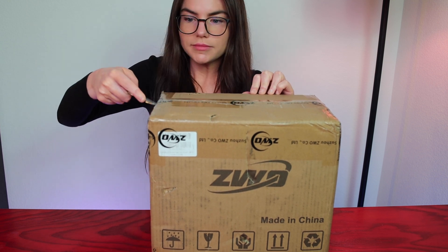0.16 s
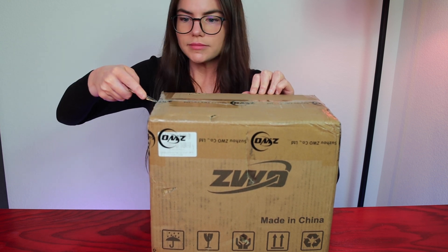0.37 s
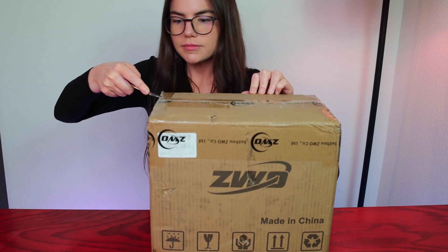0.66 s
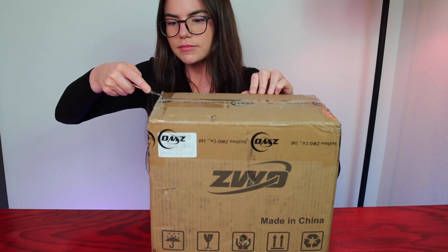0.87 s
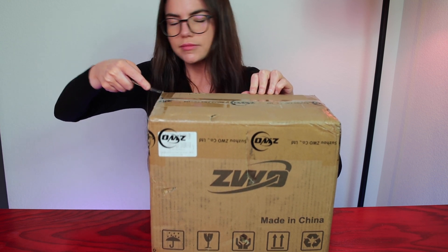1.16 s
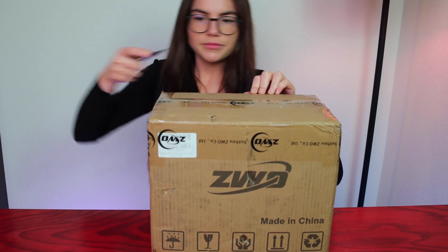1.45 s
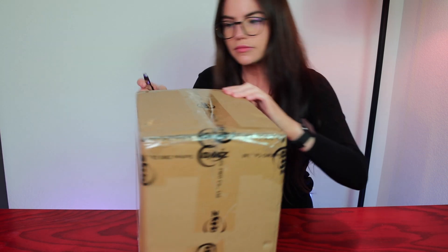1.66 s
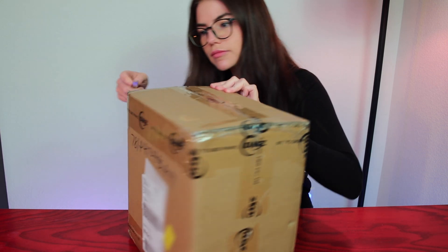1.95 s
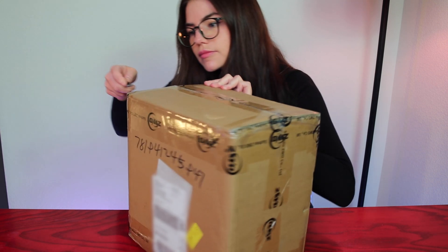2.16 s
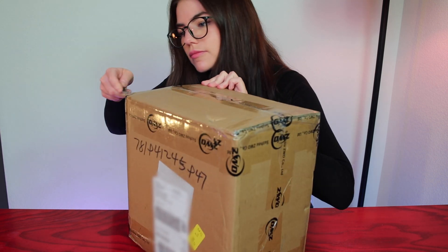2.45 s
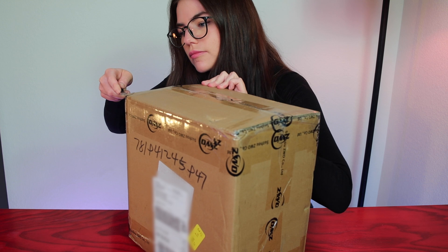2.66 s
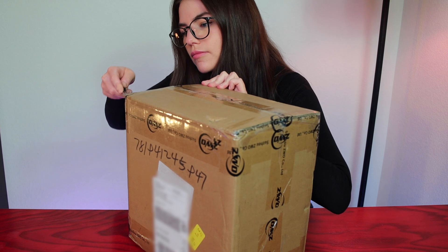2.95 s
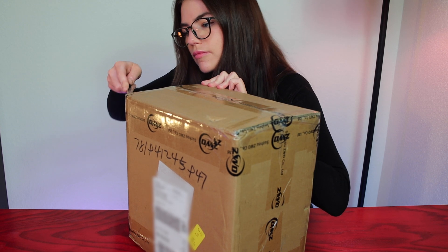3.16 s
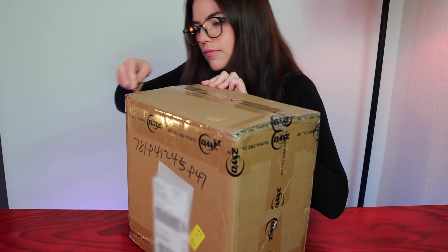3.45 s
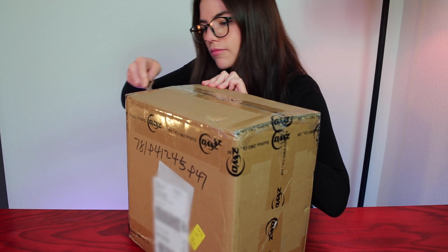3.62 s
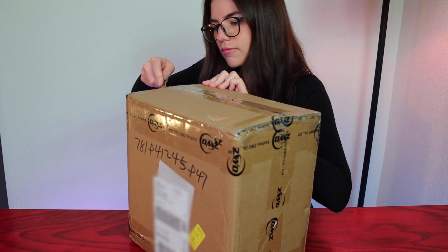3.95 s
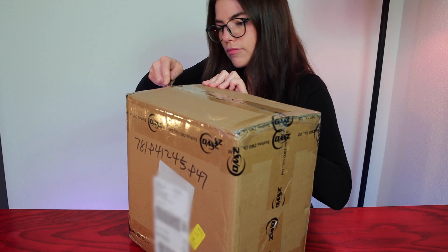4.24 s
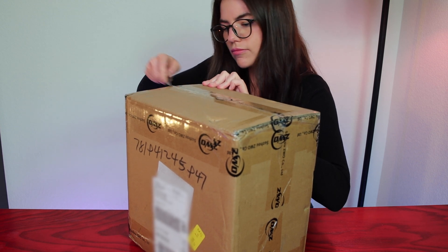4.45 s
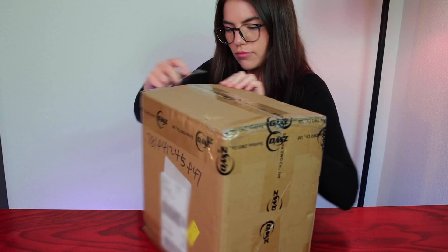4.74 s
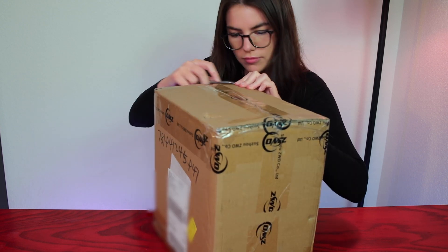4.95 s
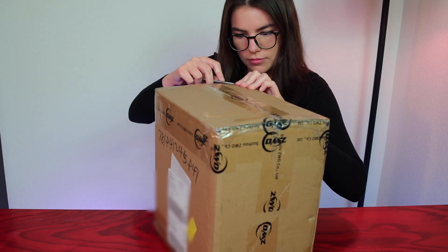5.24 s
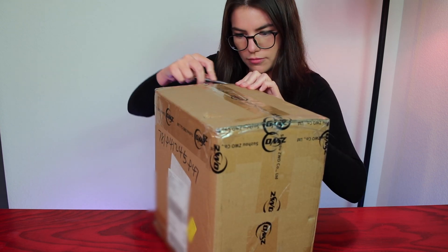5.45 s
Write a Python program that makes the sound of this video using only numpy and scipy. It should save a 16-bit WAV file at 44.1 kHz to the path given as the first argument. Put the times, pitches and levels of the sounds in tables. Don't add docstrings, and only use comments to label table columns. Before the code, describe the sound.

A quiet, softly furnished room with faint air noise and a low fan hum, heard by one near microphone, nearly mono. From 0 to 1.3 s a short blade saws through packing tape on a big hollow cardboard box: dry, gritty rasps in short strokes, with clean cracks and dull boxy booms. The loudest snap comes at 0.62 s; a narrow scraping along the flap swells around 1.0 and 1.25 s, and a bright snap parts the tape at 1.29 s. From 1.5 to 2.5 s the box turns, hissing and rumbling over the table with bumps and a sharp tap near 1.9 s. Faint ticks follow until 3.5 s, when ripping cuts resume to 4.2 s, with a strong crack at 3.87 s. A bright snap at 4.54 s precedes a short, bumping slide from 4.65 to 5.1 s. After near quiet, small cuts and snaps return from 5.3 s to the end.

```python
import sys
import numpy as np
from scipy import signal
from scipy.fft import rfft, irfft
from scipy.io import wavfile
from scipy.ndimage import uniform_filter1d

SR = 44100
rng = np.random.default_rng(int(sys.argv[2]) if len(sys.argv) > 2 else 0)


def natural_amplitude(level_db):
    exponent = np.asarray(level_db, float) / 20
    return 10 ** exponent


def wrap_up_sound(samples):
    columns = np.atleast_2d(samples).T
    tamed = np.clip(columns, -1, 1)
    steps = np.round(tamed * 32767).astype(np.int16)
    wavfile.write(sys.argv[1], SR, steps)


N = 246078


def rms_one(x):
    return x / np.sqrt(np.mean(x ** 2) + 1e-20)


def band(x, low_hz, high_hz):
    return signal.sosfilt(signal.butter(2, [low_hz, high_hz], "band", fs=SR, output="sos"), x)


def colour(x, spectrum):
    hz, db = np.transpose(spectrum)
    grid = np.maximum(np.arange(2049) * SR / 4096, 1)
    log_gain = np.log(natural_amplitude(np.interp(np.log(grid), np.log(hz), db)))
    cepstrum = irfft(log_gain)
    cepstrum[1:2048] *= 2
    cepstrum[2049:] = 0
    pulse = irfft(np.exp(rfft(cepstrum)))
    pulse /= np.sqrt(np.sum(pulse ** 2))
    return signal.fftconvolve(x, pulse)[:len(x)]


def body(x, modes, widen):
    out, power = 0, 0
    for k, (hz, width, db) in enumerate(modes):
        r = np.exp(-np.pi * width * widen / SR)
        a = [1, -2 * r * np.cos(2 * np.pi * hz / SR), r * r]
        b = np.array([1, 0, -1]) * (1 - r * r) / 2
        out = out + (-1) ** k * natural_amplitude(db) * signal.lfilter(b, a, x + 1e-18)
        power += natural_amplitude(db) ** 2 * (1 - r * r) / 2
    return out / np.sqrt(power)


def drift(rate):
    r = np.exp(-2 * np.pi * rate / SR)
    noise = rng.standard_normal(N + SR)
    return rms_one(signal.lfilter([1], [1, -2 * r, r * r], noise)[SR:])


def slips(per_s, spread_db, lurch_db):
    sizes = natural_amplitude(spread_db * np.minimum(rng.exponential(1, N), 3)) * rng.choice([-1, 1], N)
    happens = rng.random(N) < per_s / SR
    lurches = natural_amplitude(lurch_db * (0.74 * drift(78) + 0.65 * drift(25)))
    return rms_one(sizes * happens * lurches)


TURNED_S = 1.5


def each_end(x, sound):
    later = np.arange(len(x)) > TURNED_S * SR
    return sound(x * ~later, 0) + sound(x * later, 1)


# f/Hz, level/dB (per Hz)
AIR_COLOUR = [(18, -60), (30, -16.5), (115, -11), (245, -5.5), (394, -11), (721, -20.5), (801, -14.5),
              (937, -25.5), (1040, -22), (1670, -29.5), (1910, -27.5), (2120, -31), (4780, -32.5),
              (13700, -35), (16000, -36)]
AIR_DB = -52.5
HUM_HZ, HUM_WIDTH_HZ, HUM_DB = 239.7, 6.4, -56


def quiet():
    hum = body(rng.standard_normal(N), [(HUM_HZ, HUM_WIDTH_HZ, 0)], 0.53)
    hum = body(hum, [(HUM_HZ, 30, 0)], 0.44)
    air = colour(rng.standard_normal(N) * natural_amplitude(0.27 * drift(1.1)), AIR_COLOUR)
    return natural_amplitude(AIR_DB) * air + natural_amplitude(HUM_DB) * rms_one(hum)


ROOM_T60_S, ROOM_DB, WALL_CUT_HZ = 0.27, -20.5, 7900


def room(x):
    t = np.arange(SR // 2) / SR
    echoes = rng.standard_normal(len(t)) * natural_amplitude(-60 * t / ROOM_T60_S) * (t > .004)
    soften = signal.butter(1, [1200, WALL_CUT_HZ], "band", fs=SR, output="sos")
    echoes = signal.sosfilt(soften, echoes)
    return signal.fftconvolve(x, echoes / np.sqrt(np.sum(echoes ** 2)))[:N]


# t/s, level/dB
SLIDES = [
    [(1.5, -75), (1.58, -55), (1.67, -45.5), (1.76, -44.5), (2.02, -46), (2.12, -43), (2.28, -48),
     (2.47, -74)],
    [(4.64, -77), (4.68, -62), (4.72, -49), (4.94, -48), (5.03, -54.5), (5.09, -63), (5.13, -72)],
]
# t/s, level/dB
CATCHES = [
    (1.578, -54),
    (1.668, -50),
    (1.916, -64),
    (2.102, -46),
    (4.64, -50.5),
    (4.668, -48),
    (4.72, -50),
    (4.947, -59),
    (5.13, -61),
]
CATCH_DB_PER_S, CATCH_RUMBLE_DB = 300, -4
RUMBLE_DB, RUMBLE_FOLLOWS = -46.5, 0.73
SHUDDER_DB, SETTLE_S = -13, 0.28


def turning():
    t, rub = np.arange(N) / SR, -150.
    for rows in SLIDES:
        s, db = np.transpose(rows)
        outside = 4000 * np.clip(s[0] - t, 0, 1) + 60 / SETTLE_S * np.clip(t - s[-1], 0, 9)
        rub = np.maximum(rub, np.interp(t, s, db) - outside)
    catch = np.max([db - CATCH_DB_PER_S * np.abs(t - s) for s, db in CATCHES], axis=0)
    rumble = RUMBLE_DB + RUMBLE_FOLLOWS * (rub + 46)
    table = np.maximum(rumble + SHUDDER_DB, catch)
    rumble = np.maximum(rumble, catch + CATCH_RUMBLE_DB)
    return natural_amplitude(np.array([table, rumble, rub]))


# f/Hz, width/Hz, level/dB
THUD = [(62.3, 8.9, -2.5), (103, 43.6, 0), (150.2, 48.4, 0)]
# f/Hz, level/dB (per Hz)
RUMBLE_COLOUR = [(120, -31.5), (200, -2), (351, 0), (523, -11.5), (565, -7.5), (1110, -7), (1200, -8),
                 (2800, -12), (3640, -32), (6160, -120)]
# f/Hz, level/dB (per Hz)
HISS_COLOUR = [(1650, -21), (2800, -6.5), (3170, -3), (4060, -1.5), (6920, -2), (11800, -7), (14300, -2.5),
               (15200, -10), (16000, -1.5)]


def slide():
    thud, rumble, hiss = turning()
    rub = slips(6000, 4.0, 0.42)
    table = body(thud * rub, THUD, 0.52)
    grainy = colour(rumble * rub, RUMBLE_COLOUR)
    smooth = colour(hiss * slips(20000, 1.2, 0.93), HISS_COLOUR)
    return table + grainy + smooth


# t/s, level/dB
DRAG = [
    (.62, -60),
    (.78, -44),
    (.82, -62),
    (.87, -47),
    (1.03, -39.5),
    (1.11, -58),
    (1.17, -56),
    (1.24, -40),
    (1.3, -72),
]
# f/Hz, width/Hz, level/dB
FLAP_EDGE = [(2130, 310, -3), (2745, 170, 0.5)]


def flap():
    s, db = np.transpose(DRAG)
    pressure = natural_amplitude(np.interp(np.arange(N) / SR, s, db, left=-150, right=-150))
    return body(pressure * slips(5000, 2.7, 4.6), FLAP_EDGE, 1)


# t/s, crack level/dB, rap on the cardboard level/dB, push on the walls level/dB
BREAKS = [(.0593, -20.5, -55, -60), (.2907, -18, -21, -13.5), (.299, -27, -37, -56), (.0675, -36, -40, -50),
          (.607, -16, -16.5, -49), (1.0377, -19, -17.5, -16), (1.052, -22, -22, -47),
          (1.261, -27, -22.5, -26), (1.2986, -28, -38, -35), (1.5565, -40, -41.5, -33.5),
          (3.5426, -25, -23.5, -15), (3.6873, -28, -23.5, -24), (3.742, -25, -28, -24),
          (4.1457, -19, -21.5, -24), (4.1634, -24, -38, -19.5), (4.519, -33, -51, -50),
          (4.537, -35, -47, -46), (5.3182, -33, -34, -38), (5.431, -39.5, -37, -47),
          (5.5005, -38, -28, -30), (5.506, -18, -25, -34), (5.5340, -31, -27, -50)]
TEARS = [(.0232, -27, -32, -36), (.0500, -16, -17, -34), (.136, -47, -35, -27), (.033, -36, -40, -50),
         (.2168, -42, -39, -65), (.331, -27, -30, -51), (.3898, -21.5, -23.5, -28), (.425, -27, -33, -58),
         (.434, -36, -27.5, -28), (.466, -32, -34, -46), (.5348, -18, -35, -35), (.621, -4.5, -9, -22.5),
         (.7077, -22, -21, -27), (.7494, -41, -22.5, -26), (.886, -23.5, -28, -53),
         (.9604, -30, -24, -26.5), (1.0084, -30, -24, -33), (1.2286, -40, -28, -57),
         (3.091, -53, -38.5, -60), (3.198, -52, -25, -27.5), (3.8689, -13.5, -14.5, -20.5),
         (4.4982, -32, -51, -45), (5.3287, -18.5, -21.5, -55), (5.553, -21, -30, -37)]
TAPS = [(1.4596, -38, -35, -35), (1.5264, -29, -69, -44), (1.8183, -36, -31, -32), (1.888, -12, -29, -39),
        (1.8994, -19.5, -30.5, -49), (2.0793, -31, -30.5, -35), (2.4517, -26.5, -34.5, -49),
        (3.016, -59, -38.5, -37), (3.138, -46, -48, -62), (3.345, -50, -50, -60), (3.412, -46, -48.5, -57),
        (3.46, -46, -47, -60), (3.964, -35, -46, -57), (4.041, -30, -31.5, -59), (4.0966, -43, -42, -59),
        (4.35, -40, -39.5, -59), (4.6526, -55, -61.5, -32.5), (4.6703, -55, -62, -32),
        (5.1434, -45, -36.5, -69), (5.1535, -43, -40, -58)]
PARTINGS = [
    (1.2878, -10, -24, -37.5),
    (2.8598, -30.5, -41, -45),
    (2.987, -35, -37, -48),
    (4.5448, -14, -28, -38),
    (4.6205, -35, -31, -52),
]
BREAK_TOP_DB, TEAR_TOP_DB, TAP_TOP_DB, PARTING_TOP_DB = -8, -28, -36, -6
BREAK_S, TEAR_S, TAP_S, PARTING_S = .0006, 0.0019, 0.00085, 0.00064


def contacts():
    kinds = [(BREAKS, BREAK_TOP_DB, BREAK_S), (TEARS, TEAR_TOP_DB, TEAR_S), (TAPS, TAP_TOP_DB, TAP_S),
             (PARTINGS, PARTING_TOP_DB, PARTING_S)]
    return [(*row, row[1] + top_db, length) for rows, top_db, length in kinds for row in rows]


# f/Hz, width/Hz, level/dB
WALLS = [(254.7, 65.7, -0.5), (321.6, 62.3, 1.5), (416, 44.5, -1), (542, 60, -7)]
# f/Hz, width/Hz, level/dB
PANELS = [
    [(630, 179, 7), (912, 303, 8), (1360, 310, 7), (1647, 200, 5), (2195, 190, 4), (2380, 300, 4),
     (2660, 194, -1)],
    [(726, 156, 0), (1020, 177, 0.5), (1217, 188, 1.5), (1405, 128, 1.5), (1893, 367, -6), (2390, 430, -12),
     (2740, 270, -16.5)],
]
BOUNCE_S, BOUNCE_DB = 0.0018, -7.5


def snaps():
    t = np.arange(600) / SR
    crack, top, rap, push = np.zeros((4, N + len(t)))
    for s, crack_db, rap_db, push_db, top_db, length in contacts():
        signs = rng.choice([-1, 1], len(t))
        start = round(s * SR)
        at = slice(start, start + len(t))
        burst = signs * np.exp(-t / np.clip(length, 2e-4, 4e-3))
        burst[0] *= 2
        burst /= np.sqrt(np.sum(burst ** 2))
        crack[at] += natural_amplitude(crack_db + 14) * burst
        top[at] += natural_amplitude(top_db + 20.5) * burst
        rap[at] += natural_amplitude(rap_db + 23.5) * burst
        push[at] += natural_amplitude(push_db + 1) * signs[0] * np.exp(-t / 0.00034)
    panels = each_end(rap, lambda x, end: body(x, PANELS[end], 2.14))
    direct = band(crack, 2260, 6610) - band(top, 10540, 17600) + panels
    bounce = natural_amplitude(BOUNCE_DB) * np.roll(direct, round(BOUNCE_S * SR))
    return (direct + bounce + body(push, THUD + WALLS, 1.73))[:N]


# start t/s, length t/s, force at start level/dB, force at end level/dB, lean on box level/dB #
CUTS = [(.002, .01, -46, -50, 3), (.021, 0.025, -43.5, -48, 7.5), (0.05, 0.07, -34.5, -41, 3.5),
        (0.137, 0.024, -39.5, -39, 2), (0.183, 0.085, -53, -54, 1), (0.287, .07, -34, -36, 0.5),
        (0.363, 0.12, -41.5, -53.5, 2), (0.534, 0.045, -39, -49, 1), (0.598, 0.17, -32.5, -38, -2),
        (0.818, 0.066, -61, -41, -7), (0.885, 0.035, -34, -43.5, 0),
        (0.925, 0.127, -43.5, -29.5, -5.5), (1.04, 0.08, -26, -52.5, -5),
        (1.133, 0.018, -40, -52.5, -5), (1.158, 0.11, -51, -35, -3), (1.291, .012, -31, -48, -7),
        (1.88, 0.057, -45, -52, -24), (2.078, 0.023, -39, -42, -3), (2.468, 0.062, -52, -71, -35),
               (3.087, 0.041, -46.5, -48.5, 9), (3.197, 0.036, -36.5, -44.5, -0.5),
               (3.533, 0.11, -27, -31.5, 1.5), (3.655, .028, -36.5, -43.5, 1.5),
               (3.685, 0.064, -28.5, -29.5, 0), (3.75, 0.11, -30, -44.5, 0), (3.846, 0.021, -45, -35, -0.5),
               (3.878, 0.046, -32, -42, -4.5), (3.901, 0.075, -42, -55, 3), (4.130, .012, -49, -50, 0),
               (4.143, 0.042, -32, -31, -1), (4.482, 0.054, -54, -40, -1.5), (4.549, .04, -52, -58, -16),
               (5.335, 0.027, -41, -52.5, -17), (5.365, .05, -62, -55, -2), (5.42, .078, -48, -43, 1),
               (5.5, 0.096, -33.5, -33.5, -2.5)]
BITE_S, LET_GO_S = .008, 0.12
THUD_LEAD_S = 0.0073
TAPE_DB, TAPE_LOSES = -5.5, 0.15
THUD_DB, THUD_GAINS = -4.5, 0.44
JOLT_DB, JOLT_S = 0.5, 0.043


def strokes():
    t, tracks = np.arange(N) / SR, -150.
    for s, length, start_db, end_db, lean_db in CUTS:
        force = np.interp(t, [s, s + length], [start_db, end_db])
        force -= 60 / BITE_S * np.clip(s - t, 0, 9)
        force -= 60 / LET_GO_S * np.clip(t - s - length, 0, 9)
        jolt = JOLT_DB * np.exp(-np.abs(t - s) / JOLT_S)
        table = force + THUD_DB + THUD_GAINS * lean_db + jolt
        tape = force + TAPE_DB - TAPE_LOSES * lean_db
        tracks = np.maximum(tracks, [table, force + lean_db, force, tape])
    tracks[0] = np.interp(t + THUD_LEAD_S, t, tracks[0])
    return natural_amplitude(tracks)


# f/Hz, level/dB (per Hz)
TAPE_COLOUR = [
    [(1650, -23.5), (2800, 1), (3100, 3), (6480, -4), (8930, -8.5), (12800, -10.5), (14100, -4),
     (16000, -13)],
    [(1240, -27), (2100, -2), (2850, 0), (3940, -4), (6020, -4), (9060, -16.5), (14400, -8.5),
     (16000, -17.5)],
]
SLIPS_PER_S, SLIP_SPREAD_DB, LURCH_DB = 3000, 4.5, 1.5
WANDER_DB = 3


def blade():
    thud, boom, board, tape = strokes()
    train = slips(SLIPS_PER_S, SLIP_SPREAD_DB, LURCH_DB)
    rustle = 0.43 * train + 0.71 * slips(15000, 2.4, 3.8)
    wander = [natural_amplitude(WANDER_DB * drift(7.3)) for k in range(3)]
    table = body(thud * train, THUD, 1.0)
    walls = body(boom * train * wander[2], WALLS, 0.83)
    panels = 0
    for k in range(2):
        panels = panels + each_end(board * train * wander[k], lambda x, end: body(x, PANELS[end][k::2], 1))
    hiss = each_end(tape * rustle, lambda x, end: colour(x, TAPE_COLOUR[end]))
    dull = signal.sosfilt(signal.butter(2, 8500, fs=SR, output="sos"), hiss)
    bright = hiss - dull
    return table + walls + 0.57 * panels + dull * np.sqrt(wander[1]) + bright * wander[2]


def scene():
    box = blade() + snaps() + slide() + flap()
    return np.tile(box + natural_amplitude(ROOM_DB + 6.5) * room(box) + quiet(), (2, 1))


def band_limit(x):
    return signal.sosfilt(signal.butter(12, 16530, fs=SR, output="sos"), x)


CHANNEL_HISS_DB, HISS_MASKED_DB, CUTOFF_HZ = -72.5, -56, 16500


def record(dry):
    treble = np.sqrt(uniform_filter1d(band(dry[0], 3700, 13000) ** 2, size=2048))
    hiss = natural_amplitude(CHANNEL_HISS_DB) * band(rng.standard_normal(N), 730, 20000)
    hiss = hiss * (treble < natural_amplitude(HISS_MASKED_DB))
    bass_cut = signal.butter(2, 45, "high", fs=SR, output="sos")
    dry = signal.sosfilt(bass_cut, dry)
    dry = .6 * np.tanh(dry / .6)
    top_cut = signal.cheby2(16, 60, CUTOFF_HZ, fs=SR, output="sos")
    mix = signal.sosfilt(top_cut, dry + hiss * [[1], [-1]])
    return band_limit(mix)


dry = scene()
out = record(dry)
wrap_up_sound(out)
```